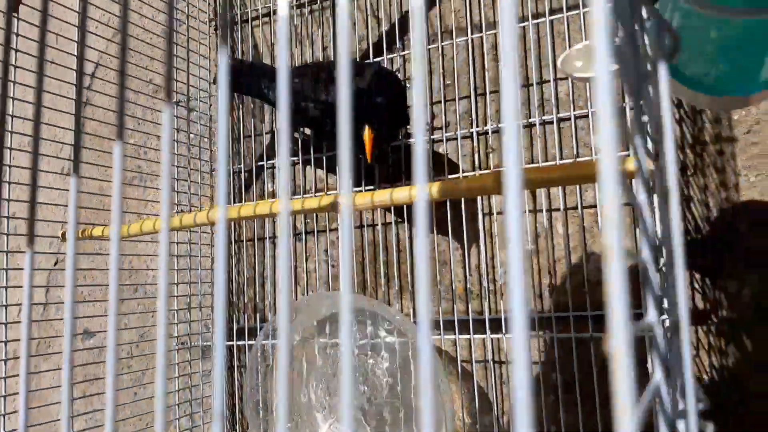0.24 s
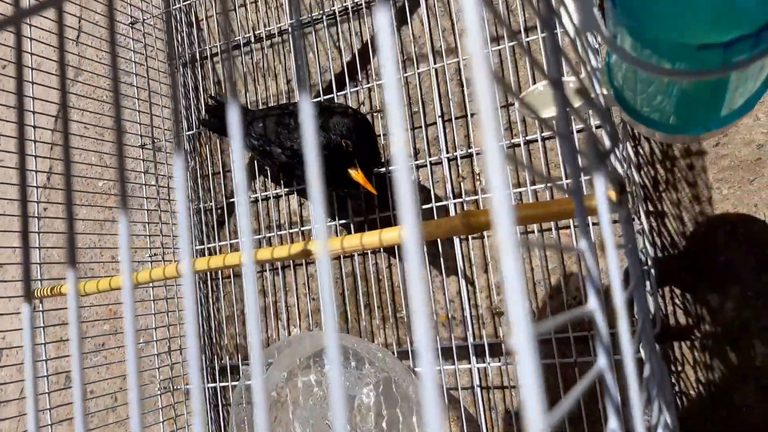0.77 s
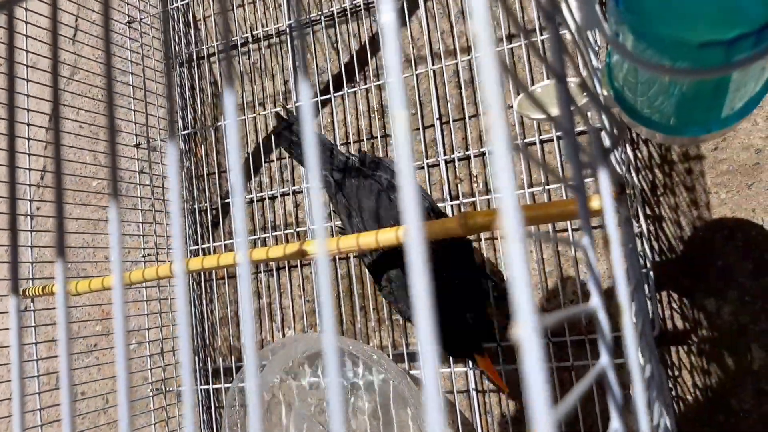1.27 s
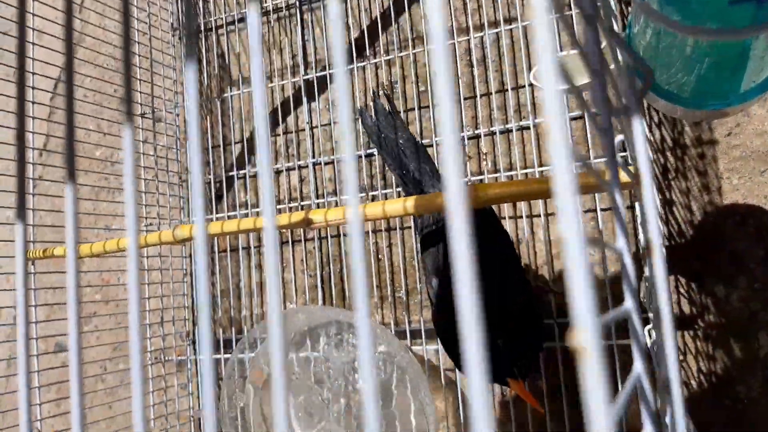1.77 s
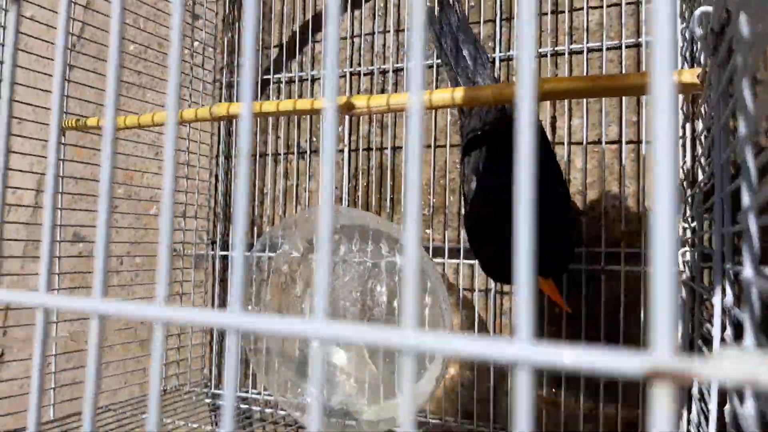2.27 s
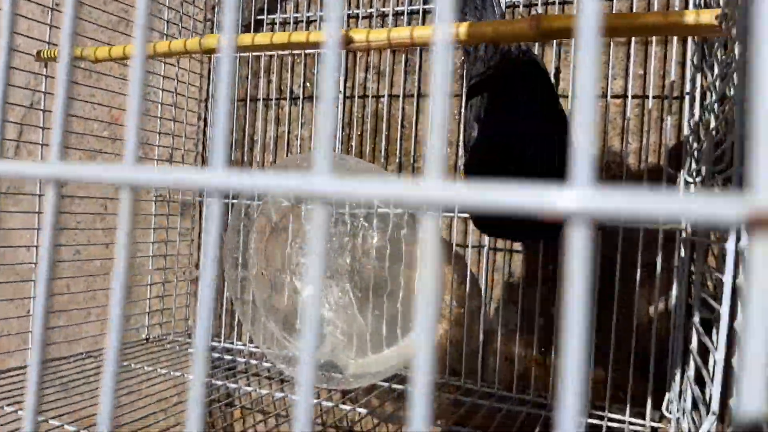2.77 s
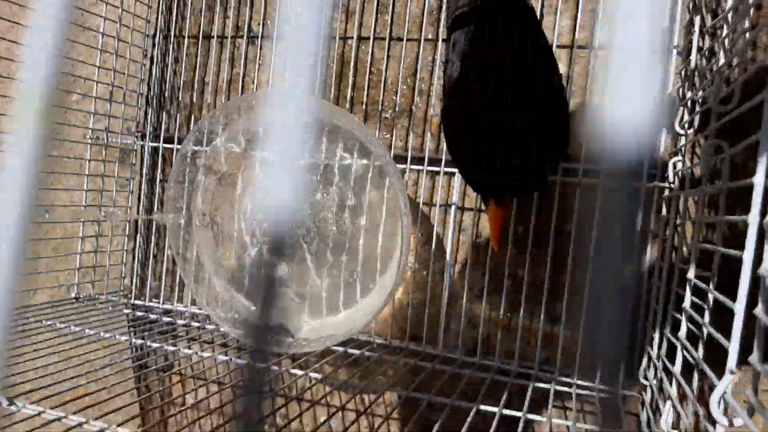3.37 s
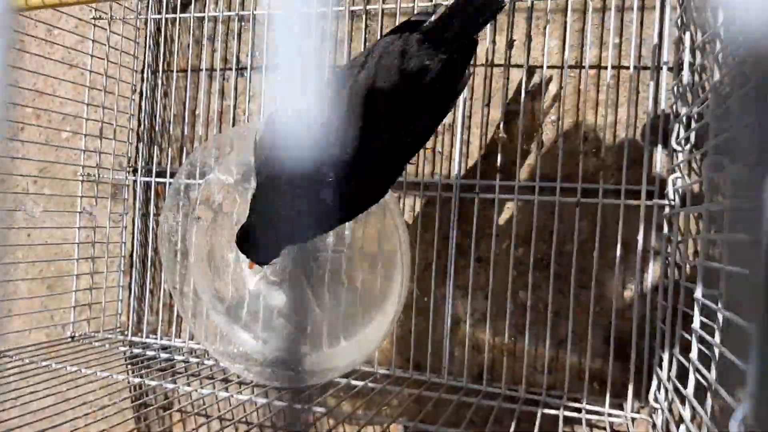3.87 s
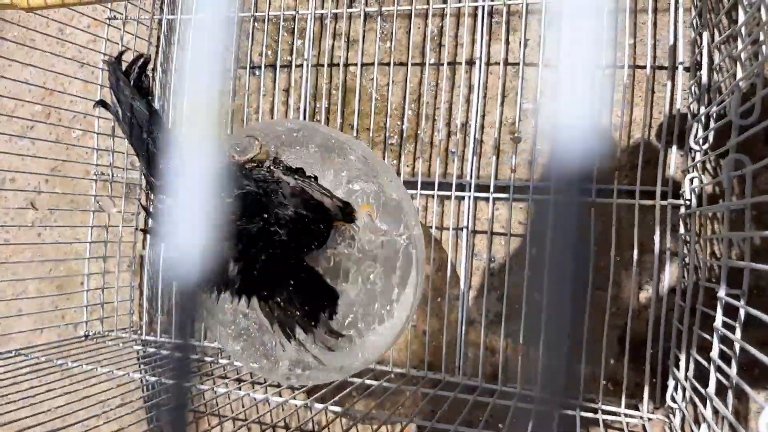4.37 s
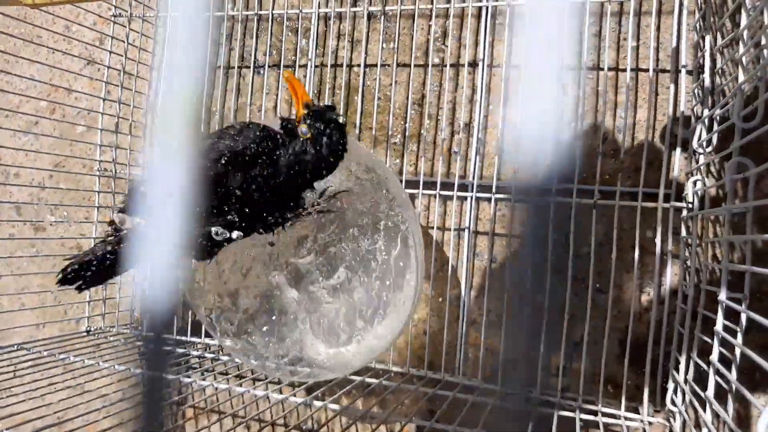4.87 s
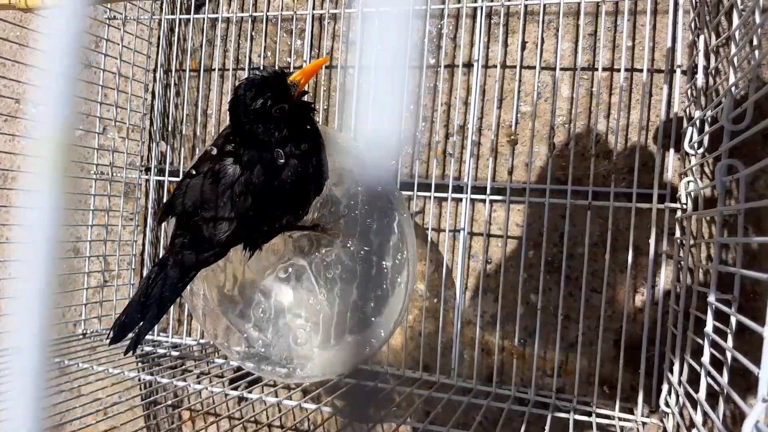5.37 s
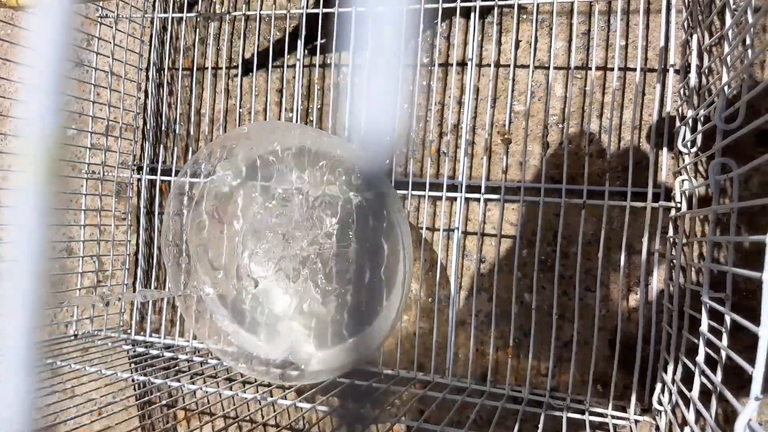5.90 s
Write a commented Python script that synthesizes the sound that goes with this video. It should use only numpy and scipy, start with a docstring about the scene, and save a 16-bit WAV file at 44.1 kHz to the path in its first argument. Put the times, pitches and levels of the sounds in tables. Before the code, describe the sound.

Quick bird chirps, hoarse gliding whistles and grainy flapping puffs with faint plastic knocks ring in a small hard-walled space above a low hum.

```python
"""Caged birds whistle and chirp in a small hard-walled room, heard through a phone microphone.
Each note is a gliding tone with partials; uneven air flow makes it hoarse, raspy and breathy.
Puffs of grainy noise are wing beats, water flicks and breathy onsets of notes; a plastic bath knocks.
A narrow low hum of resonant noise wavers among rumble and the patchy hiss of the room."""
import sys
import numpy as np
from scipy import signal
from scipy.fft import rfft, irfft, next_fast_len
from scipy.io import wavfile
from scipy.ndimage import uniform_filter1d

SR = 44100
rng = np.random.default_rng(int(sys.argv[2]) if len(sys.argv) > 2 else 0)


def put_to_file(sound):
    """Save the sound as 16-bit audio at rate SR, in the file named by the first command-line argument."""
    columns = np.atleast_2d(sound).T  # one column per channel
    safe = np.clip(columns, -1, 1)
    whole_steps = np.round(safe * 32767)
    wavfile.write(sys.argv[1], SR, whole_steps.astype(np.int16))


N = 270774  # length in samples


def amp(db):
    """Decibels to gain."""
    return 10 ** (np.asarray(db) / 20)


def evened(x):
    """Scales to rms 1."""
    return x / np.sqrt(np.mean(x ** 2) + 1e-20)


def read(points, hz):
    """Reads a spectrum on a log-frequency axis."""
    f, value = np.transpose(points)
    return np.interp(np.log(hz + 1), np.log(f + 1), value)


def add(mix, s, sound):
    """Mixes a sound in at time s in seconds."""
    part = mix[round(s * SR):][:len(sound)]
    part += sound[:len(part)]


def coloured(x, points):
    """Filters x by a spectrum in dB."""
    size = next_fast_len(len(x))
    gain = amp(read(points, np.fft.rfftfreq(size, 1 / SR)))
    return irfft(rfft(x, size) * gain, size)[:len(x)]


def wander(smooth_s):
    """Random drift of rms 1: white noise averaged twice over smooth_s seconds."""
    size = max(round(smooth_s * SR), 1)
    once = uniform_filter1d(rng.standard_normal(N), size)
    return evened(uniform_filter1d(once, size))


def syrinx(hz, first_db, second_db, upper_db, tilt_db=0.5, flicker_db=np.zeros(10)):
    """A gliding tone with its partials; from the third up, those above 17.6 kHz are dropped."""
    phase = 2 * np.pi * np.cumsum(hz) / SR
    tone = amp(first_db) * np.sin(phase) + amp(second_db) * np.sin(2 * phase)
    for k in range(3, 10):
        # upper_db belongs to the fourth partial; the tilt is in dB per partial
        gain = amp(upper_db + tilt_db * (k - 4) + flicker_db[k])
        tone += gain * np.sin(k * phase) * (k * hz < SR / 2.5)
    return np.sqrt(2) * tone


# Whistles close to the microphone, one list of rows a whistle, levels before the mix.
# Each row: time in seconds, pitch in Hz, level in dB, beak opening as second partial over first in dB.
WHISTLE_CURVES = [
    [(0.0, 4990, -10.5, -24), (0.05, 5040, -18, -19), (0.09, 5020, -17.5, -18), (0.128, 4990, -22, -13)],
    [(0.45, 1445, -40, 17), (0.5, 1846, -35, 8), (0.55, 2027, -32.5, 6), (0.6, 2175, -36, -5),
     (0.68, 2020, -52.5, -43)],
    [(0.685, 2360, -40.5, -21), (0.74, 2510, -53, -17), (0.764, 2930, -32.5, -29), (0.8, 3710, -31.5, -24)],
    [(0.935, 1570, -33.5, 10.5), (0.97, 2092, -42, 0), (1.02, 2396, -33, -61), (1.14, 2690, -60, -13)],
    [(1.645, 1512, -38.5, 7), (1.675, 1900, -27.5, 4), (1.72, 2106, -22, 7.5), (1.76, 2186, -29, 3.5),
     (1.82, 2475, -25.5, -49), (1.86, 2700, -28, -22), (1.885, 3135, -27.5, -18), (1.915, 3086, -37, -40)],
    [(1.772, 1428, -34, 13), (1.79, 1770, -25.5, 14), (1.82, 1910, -29, 22)],
    [(1.894, 2140, -29.5, -9), (1.912, 1494, -45, 12)],
    [(2.845, 3094, -34, -24), (2.88, 3445, -22, -48), (2.94, 3373, -27, -14), (2.99, 3406, -26.5, 17),
     (3.025, 3567, -33, 5), (3.05, 2524, -34.5, -32), (3.07, 2185, -31, 7), (3.14, 2304, -53, -8)],
    [(3.546, 1462, -40.5, -9), (3.574, 2037, -35.5, 2.5), (3.64, 2410, -33, -3), (3.7, 2786, -35, -22),
     (3.722, 3006, -27, -31)],
    [(3.716, 1588, -25.5, 29), (3.75, 2015, -20, 17), (3.85, 2543, -23, 10.5), (3.885, 2880, -18, 17),
     (3.93, 3010, -20, 9.5), (4.0, 3038, -20.5, 13.5), (4.015, 3120, -34, 16)],
    [(5.188, 2294, -41, -14), (5.22, 2664, -44, -28), (5.3, 2990, -53, 10)],
]
# upper partials rise as the beak opens and as the bird sings louder than EASY_DB
UPPER_DB, UPPER_PER_BEAK, UPPER_PER_EFFORT, EASY_DB = -21.5, 0.21, 0.2, -24
WHISTLE_TILT_DB, BROKEN_DB = -1.7, 5.5  # per partial; coming and going of upper partials in a full glide
FULL_GLIDE_PER_S = 3.33  # speed of the natural log of pitch that counts as a full glide
HOARSE_HELD, HOARSE_GLIDE = 0.062, 0.26  # whistles are hoarse while they glide, clear when held
WOBBLE_HELD, WOBBLE_GLIDE = 0.00072, .015  # unsteady pitch as a share
HELD_SHARE = 0.19  # a held whistle keeps only this share of its turbulence


def whistles(tremor):
    """The beak shares level between the first two partials; gives whistles and their turbulent part."""
    out, husk, flicker = np.zeros((2, N)), wander(0.001), wander(.007)
    for rows in WHISTLE_CURVES:
        s, *columns = np.transpose(rows)
        t = np.arange(s[0], s[-1], 1 / SR)
        at = round(s[0] * SR) + np.arange(len(t))
        hz, db, beak_db = (np.interp(t, s, column) for column in columns)
        hz = uniform_filter1d(hz, 400, mode="nearest")
        glide = np.clip(abs(np.gradient(np.log(hz))) * SR / FULL_GLIDE_PER_S, 0, 1)
        hz = hz * (1 + (WOBBLE_HELD + WOBBLE_GLIDE * glide) * tremor[at])
        # each partial reads its own stretch of the flicker
        stretches = at + np.arange(10)[:, None] * (N // 10)
        broken_db = BROKEN_DB * np.take(flicker, stretches, mode="wrap") * np.sqrt(glide)
        first_db = db - 10 * np.log10(1 + amp(beak_db) ** 2)
        upper_db = db + UPPER_DB + UPPER_PER_BEAK * beak_db + UPPER_PER_EFFORT * (db - EASY_DB)
        hoarse = 1 + (HOARSE_HELD + HOARSE_GLIDE * glide) * husk[at]
        edges = np.clip(np.minimum(t - s[0], s[-1] - t) / 0.0022, 0, 1)
        tone = syrinx(hz, first_db, first_db + beak_db, upper_db, WHISTLE_TILT_DB, broken_db)
        tone *= edges * hoarse
        add(out[0], s[0], tone)
        add(out[1], s[0], tone * (HELD_SHARE + (1 - HELD_SHARE) * glide))
    return out


# Slow drift of the room's background. Each row: time in seconds, hum level in dB, hiss level in dB.
BACKGROUND_DRIFT = [(0, -34, -55), (1.4, -33.5, -60.5), (2.2, -29, -49), (3.4, -32, -61), (4.6, -33, -47),
                    (5.3, -31, -50), (6.14, -31.5, -61)]
# Resonances of the hum. Each row: centre in Hz, width at half amplitude in Hz, relative height in dB.
HUM_RESONANCES = [(300.1, 11.3, -3), (331.6, 19.6, 3.5), (258, 19, -10.5), (99.1, 17.7, -18.5),
                  (117.7, 9.2, -23.5), (167.8, 17, -23), (391.8, 12.6, -15.5), (457.7, 16, -23.5),
                  (544.3, 8.7, -16.5), (1008, 22, -31)]
# Colour of the rumble under the room. Each row: frequency in Hz, relative density in dB per Hz.
RUMBLE_COLOUR = [(25, -56.5), (80, -23.5), (300, -1), (500, -4.5), (800, -12.5), (1300, -30), (2500, -39.5)]
RUMBLE_DB = -47
# Colour of the room's hiss. Each row: frequency in Hz, relative density in dB per Hz.
HISS_COLOUR = [(600, 10.5), (1300, 4.5), (3000, 4.5), (8000, 0), (12000, -3.5), (16000, -3.5)]


def background():
    """Noise in narrow resonances makes the hum; rumble and patchy hiss lie around it."""
    s, hum_db, hiss_db = np.transpose(BACKGROUND_DRIFT)
    t, hz = np.arange(N) / SR, np.fft.rfftfreq(N, 1 / SR)
    peaks = sum(amp(db) / (1 + (2 * (hz - f) / width) ** 2) for f, width, db in HUM_RESONANCES)
    hum = evened(irfft(rfft(rng.standard_normal(N)) * peaks, N))
    rumble = evened(coloured(rng.standard_normal(N), RUMBLE_COLOUR))
    hiss = evened(coloured(rng.standard_normal(N), HISS_COLOUR))
    hiss *= amp(2.2 * wander(.025))  # patches
    hum *= amp(np.interp(t, s, hum_db))
    hiss *= amp(np.interp(t, s, hiss_db))
    return hum + amp(RUMBLE_DB) * rumble + hiss


# Puffs of noise: wing beats, water flicks and the breathy onsets of notes, levels before rise and mix.
# Each row is a puff: start in seconds, treble level in dB, body level in dB, treble t60 in seconds.
NOISE_PUFFS = [(0.311, -46, -54, 0.58), (0.442, -46, -61, 0.11), (0.629, -40, -48, .1),
               (0.745, -47, -60.5, 0.13), (1.352, -48, -58, 0.15), (1.653, -39, -52, 0.7),
               (2.172, -40, -62, 0.18), (2.236, -32, -43, 0.11), (2.413, -34, -41.5, 0.42),
               (2.461, -24, -33, 0.16), (2.539, -34, -43, 0.23), (2.627, -39, -45, 0.14),
               (2.711, -46, -48, 0.65), (2.774, -34, -52, 0.12), (3.008, -34, -40, 0.083),
               (3.0789, -33, -49, 0.15), (3.1632, -41.5, -52.5, 0.47), (3.279, -43, -56.5, 0.95),
               (3.322, -21.5, -35, 0.029), (3.472, -44, -70, 0.16), (3.652, -43, -45, 0.13),
               (3.716, -39, -52.5, 0.53), (4.078, -47.5, -57.5, 0.64), (4.191, -37, -74, 0.16),
               (4.3233, -43, -36.5, 0.15), (5.2465, -38, -69, 0.13), (5.376, -45, -46.5, 0.27),
               (5.452, -35, -66, 0.21), (5.494, -40, -66, 0.21)]
# Colour of the bright hiss of a puff. Each row: frequency in Hz, relative density in dB per Hz.
PUFF_TREBLE = [(2500, -28), (5000, -3), (9000, 4), (13000, -2.5), (16000, 5)]
# Colour of the duller body of a puff. Each row: frequency in Hz, relative density in dB per Hz.
PUFF_BODY = [(400, 1), (1000, 4), (2200, 7.5), (4000, -1), (8000, -24.5)]
TREBLE_RISE_S, BODY_RISE_S = 0.0023, 0.0042
BODY_LINGER = 2.07  # body t60 over treble t60


def noise_puffs():
    """Each row is a puff of grainy noise with a quick rise: bright hiss over a duller body."""
    grain = rng.standard_normal((2, N)) * amp(2.5 * wander(.003))
    _, _, z = signal.stft(grain, SR, nperseg=256)
    # the colour changes in patches of time and frequency
    patches = uniform_filter1d(rng.standard_normal(z.shape), 8, 2)
    patches = evened(uniform_filter1d(patches, 10, 1))
    grain = signal.istft(z * amp(2.85 * patches), SR, nperseg=256)[1][:, :N]
    treble = evened(coloured(grain[0], PUFF_TREBLE))
    body = evened(coloured(grain[1], PUFF_BODY))
    envelopes, t = np.zeros((2, N)), np.arange(0, .5, 1 / SR)
    for s, treble_db, body_db, t60 in NOISE_PUFFS:
        treble_fade = amp(treble_db - 60 * t / t60)
        body_fade = amp(body_db - 60 * t / (BODY_LINGER * t60))
        add(envelopes[0], s, (1 - np.exp(-t / TREBLE_RISE_S)) * treble_fade)
        add(envelopes[1], s, (1 - np.exp(-t / BODY_RISE_S)) * body_fade)
    return envelopes[0] * treble + envelopes[1] * body


# Short husky sweeps and faint notes, levels before the husk and the mix.
# Each row: start in seconds, length in seconds, start pitch in Hz, end pitch in Hz, level in dB.
HUSKY_SWEEPS = [(0.432, 0.047, 3660, 3910, -46.5), (1.236, 0.023, 5250, 5480, -50.5),
                (1.607, 0.027, 2490, 2010, -50.5), (1.725, 0.027, 2930, 2990, -43),
                (1.762, 0.026, 4480, 4850, -42), (1.806, 0.018, 4240, 4620, -28.5),
                (2.12, 0.044, 4280, 3920, -49.5), (2.762, 0.029, 5780, 6970, -33),
                (3.056, 0.022, 5300, 4560, -45), (3.097, 0.01, 4620, 3650, -33.5),
                (3.719, 0.045, 5860, 6120, -29), (3.722, 0.037, 6560, 7500, -46),
                (4.422, 0.014, 3000, 4930, -49), (4.423, 0.03, 2100, 2166, -51),
                (4.585, 0.045, 2710, 2790, -46), (4.687, 0.024, 5500, 6000, -46),
                (4.757, 0.025, 5560, 5970, -41.5), (4.826, .018, 5600, 5460, -40),
                (4.756, 0.02, 2904, 2930, -44), (4.816, 0.034, 2660, 3040, -48),
                (4.989, 0.026, 3070, 2366, -46), (5.125, 0.091, 5430, 3250, -48),
                (5.345, 0.029, 4700, 5280, -46.5), (5.365, 0.065, 4800, 3600, -44),
                (5.342, 0.044, 2310, 2750, -49), (5.455, 0.022, 2200, 3045, -37),
                (5.466, 0.019, 2600, 2640, -42), (5.489, 0.032, 5500, 5370, -35),
                (5.613, 0.013, 2750, 3560, -39), (5.55, 0.012, 5130, 7600, -35.5),
                (5.613, 0.013, 5100, 8100, -34), (5.7, 0.12, 5790, 4990, -48),
                (5.818, 0.14, 3820, 2430, -53), (5.946, 0.2, 2207, 2650, -59.5),
                (6.033, 0.13, 8270, 2850, -48)]


def husky_notes():
    """Straight pitch sweeps with weak partials, made husky by a fast random level."""
    out = np.zeros(N)
    for s, length, start_hz, end_hz, db in HUSKY_SWEEPS:
        hz = np.linspace(start_hz, end_hz, round(length * SR))
        tone = syrinx(hz, db, db - 17, db - 31.0)
        add(out, s, tone * signal.windows.tukey(len(hz), .4))
    return out * (0.15 + wander(0.0013))


# Chirps close to the microphone, a table for each kind, levels before the mix.
# Each row: start in seconds, length in seconds, pitch at the turn in Hz before smoothing, level in dB.
RISING = [(0.928, 0.023, 4420, -39), (0.95, 0.058, 4140, -40.5), (1.936, 0.18, 2411, -39.5),
          (1.971, 0.12, 3420, -40), (2.739, 0.022, 2660, -37), (2.777, 0.025, 3653, -17),
          (3.079, 0.027, 3280, -36), (3.136, 0.048, 2550, -41.5), (4.415, 0.021, 2720, -35.5),
          (4.916, 0.0444, 3610, -43.5), (4.999, 0.02, 3610, -37.5), (5.195, 0.047, 3755, -39.5),
          (5.562, 0.032, 4474, -15), (5.653, 0.029, 3804, -20)]
FALLING = [(0.897, 0.042, 3350, -34), (0.985, 0.042, 4910, -37), (1.028, 0.032, 5035, -31.5),
           (1.085, 0.022, 4900, -29.5), (1.138, 0.018, 5110, -24.5), (1.198, 0.0255, 4860, -32.5),
           (2.245, 0.029, 4770, -31.5), (4.691, 0.027, 4830, -27), (4.761, 0.037, 4910, -29.5),
           (4.839, 0.024, 4820, -29)]
LEVEL = [(2.173, 0.046, 4436, -33.5), (2.233, 0.019, 2915, -39.5), (2.248, 0.054, 4250, -37),
         (3.069, 0.036, 4447, -28), (3.15, 0.025, 5760, -34.5), (3.153, 0.03, 3497, -35.5),
         (3.345, 0.021, 3495, -40.5), (3.35, 0.029, 2850, -48), (4.603, 0.024, 4100, -31),
         (4.638, 0.028, 4385, -24), (4.729, 0.0146, 4424, -22.5), (4.786, 0.027, 4280, -22.5),
         (4.864, 0.0334, 4327, -32.5), (5.079, 0.014, 5610, -41.5), (5.508, 0.017, 4250, -17.5),
         (5.62, 0.02, 4463, -17.5)]
REEDY = [(0.554, 0.033, 3002, -41.5), (2.156, 0.056, 3500, -48.5), (3.074, 0.029, 1556, -56),
         (5.39, 0.03, 2996, -38.5), (5.513, 0.015, 2126, -36.5)]
SCOOPED = [(2.843, 0.021, 4010, -18.5), (4.45, 0.0295, 3607, -21), (4.506, 0.027, 3784, -19),
           (4.56, 0.026, 3743, -21), (4.614, 0.023, 3670, -23.5), (4.681, 0.028, 3560, -27.5),
           (5.5, 0.033, 3550, -24)]
# Pitch bends of the rising, falling, level, reedy and scooped chirps, before smoothing.
# Each row: start and end pitch as shares of the pitch at the turn, place of the turn from 0 to 1.
CHIRP_BENDS = [(.89, 1.02, 0.48), (1.02, .87, 0.31), (.985, 1.003, 0.14), (.94, 1.0, 0.29),
               (.8, 1.01, 0.46)]
# Colours of the same kinds. Each row: second partial, then fourth partial, in dB over the first.
CHIRP_COLOURS = [(-33.5, -34), (-15, -18.5), (-19.5, -26), (-1.5, -6.5), (-29.5, -29.5)]
CHIRP_TILT_DB = -3  # per upper partial


def chirps(tremor):
    """Notes of a kind share a bend and a colour; all swell in over a few milliseconds and end quickly."""
    out = np.zeros(N)
    kinds = zip(CHIRP_BENDS, CHIRP_COLOURS, [RISING, FALLING, LEVEL, REEDY, SCOOPED])
    for (start, end, turn), (second_db, upper_db), notes in kinds:
        for s, length, turn_hz, db in notes:
            u = np.arange(0, 1, 1 / (length * SR))  # place within the note
            bend = np.interp(u, [0, turn, 1], [start, 1, end])
            hz = turn_hz * uniform_filter1d(bend, len(u) // 4, mode="nearest")
            # notes shorter than 31 ms wobble most
            wobble = 0.017 * min(0.031 / length, 1)
            hz *= 1 + wobble * tremor[round(s * SR):][:len(u)]
            shape = np.clip(np.minimum(u * length / 0.0072, (1 - u) / 0.14), 0, 1)
            add(out, s, syrinx(hz, db, db + second_db, db + upper_db, CHIRP_TILT_DB) * shape)
    return out


# Colour of the air hissing past the beak. Each row: frequency in Hz, relative density in dB per Hz.
BREATH_COLOUR = [(2500, -29.5), (5000, -10), (9000, 3), (13000, -5), (16000, 3)]
BREATH_DB = -19.5  # against the level of the blown notes
WHISTLE_BREATH, WHISTLE_RASP = 0.97, 1.9  # whistle turbulence against that of chirps


def near_birds():
    """Whistles and chirps, made uneven, raspy and airy by the flow through the syrinx."""
    tremor = wander(0.0021)
    # the air flow is uneven: slowly in whistles, quickly in chirps
    held, gliding = whistles(tremor) * amp(1.5 * wander(0.0056))
    quick = chirps(tremor) * amp(2.5 * wander(0.004))
    effort = np.sqrt(abs(uniform_filter1d((held + quick) ** 2, 200)))
    blown = np.sqrt(abs(uniform_filter1d((WHISTLE_BREATH * gliding + quick) ** 2, 200)))
    # turbulence spreads each tone into a wide hiss, more so in loud notes
    rasp = (amp(-38.5) + amp(-6.0) * effort) * wander(0.00031)
    breath = evened(coloured(rng.standard_normal(N), BREATH_COLOUR))
    air = amp(BREATH_DB) * blown * breath
    return held + WHISTLE_RASP * rasp * gliding, quick * (1 + rasp) + air


# Knocks on the plastic bath. Each row: start in seconds, level in dB before rise and mix, pitch in Hz.
BATH_KNOCKS = [(2.468, -41, 980), (2.579, -42, 1017), (3.572, -51, 940), (4.797, -52, 980),
               (5.116, -52, 993), (5.362, -40.5, 987)]
KNOCK_RISE_S, KNOCK_T60_S = 0.00047, 0.28


def knocks():
    """Feet and wings knock the bath, which rings briefly on one hollow note."""
    out, t = np.zeros(N), np.arange(0, .3, 1 / SR)
    for s, db, hz in BATH_KNOCKS:
        envelope = (1 - np.exp(-t / KNOCK_RISE_S)) * amp(db - 60 * t / KNOCK_T60_S)
        add(out, s, envelope * np.sin(2 * np.pi * hz * t))
    return out


# Ringing of the small hard-walled room. Each row: frequency in Hz, decay t60 in seconds.
ROOM_DECAY = [(1000, 0.32), (3000, 0.19), (8000, 0.17), (14000, 0.12)]


def room(x, gap_s=.002):
    """Sparse reflections of random sign; three tails take turns so that like notes ring differently."""
    out, t = np.zeros(N), np.arange(N) / SR
    for k in range(3):
        taps = np.zeros(SR // 2)
        at = np.arange(round(gap_s * SR), len(taps) - 20, 20)
        early = 1 + 0.16 * np.exp(-at / (0.031 * SR))  # the nearest walls answer first and loudest
        taps[at + rng.integers(0, 20, len(at))] = early * rng.choice([-1., 1.], len(at))
        hz, frames_s, z = signal.stft(taps, SR, nperseg=128)
        decay = amp(-60 * frames_s / read(ROOM_DECAY, hz)[:, None])
        tail = signal.istft(z * decay, SR, nperseg=128)[1]
        turn = np.sqrt(2 / 3) * np.cos(2 * np.pi * 1.5 * t + k * np.pi / 3)
        out += signal.oaconvolve(x * turn, tail / np.linalg.norm(tail))[:N]
    return out


def scene():
    """Near birds, puffs and knocks arrive directly and by the walls, husky notes mostly by the walls."""
    held, quick = near_birds()
    husky, bursts = husky_notes(), noise_puffs() + knocks()
    direct = amp(-1.5) * held + amp(-1.5) * quick + amp(-4) * husky + bursts
    to_walls = amp(-5.0) * held + amp(-2.5) * quick + husky + amp(-3.5) * bursts
    return (direct + room(to_walls) + background())[None]


# Response of the phone microphone. Each row: frequency in Hz, gain in dB.
MIC_RESPONSE = [(25, -11), (70, -0.5), (5500, 0), (7200, 0), (8600, -17), (10000, -7), (13000, 9),
                (15500, 1.5)]
EDGE_HZ = 15570  # upper band limit


def record(dry):
    """The microphone port dips near 8.5 kHz and peaks above 12 kHz; then the band limit."""
    heard = coloured(dry[0], MIC_RESPONSE)[None]
    lowpass = signal.firwin(511, EDGE_HZ, window=("kaiser", 9), fs=SR)
    return signal.oaconvolve(heard, lowpass[None], "same")


dry = scene()
out = record(dry)
put_to_file(out)
```